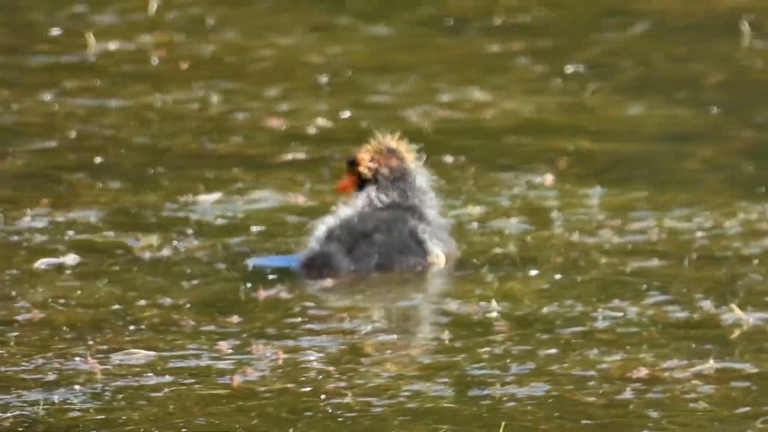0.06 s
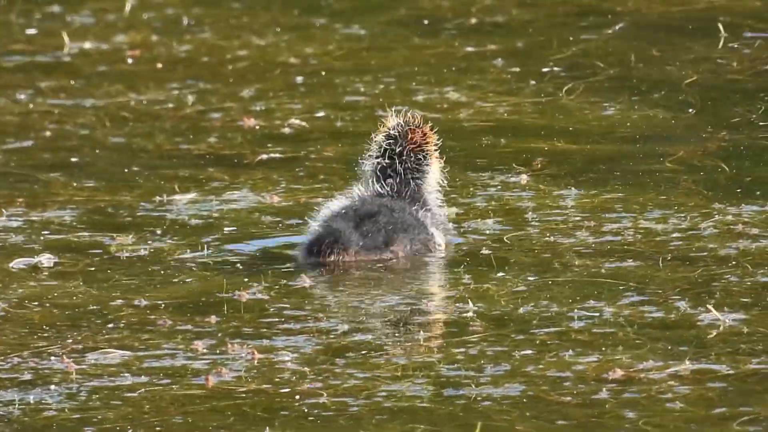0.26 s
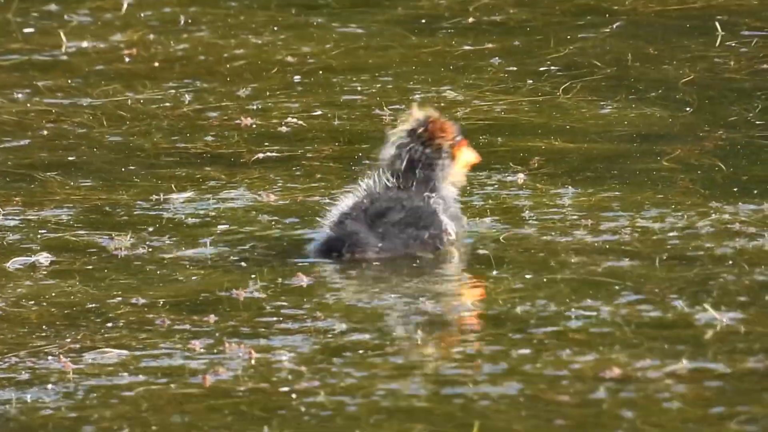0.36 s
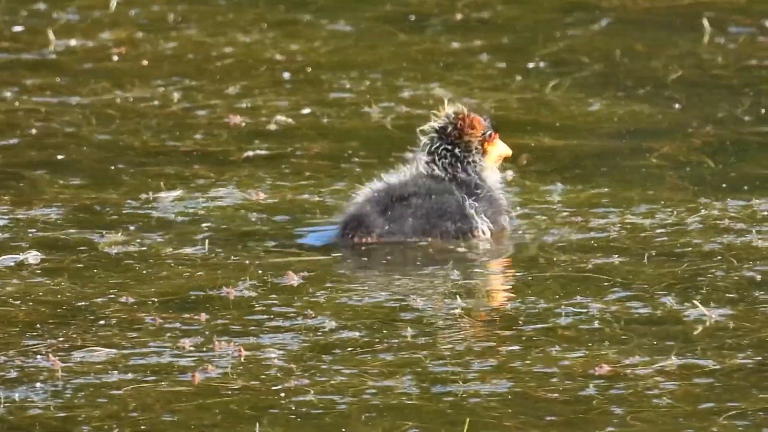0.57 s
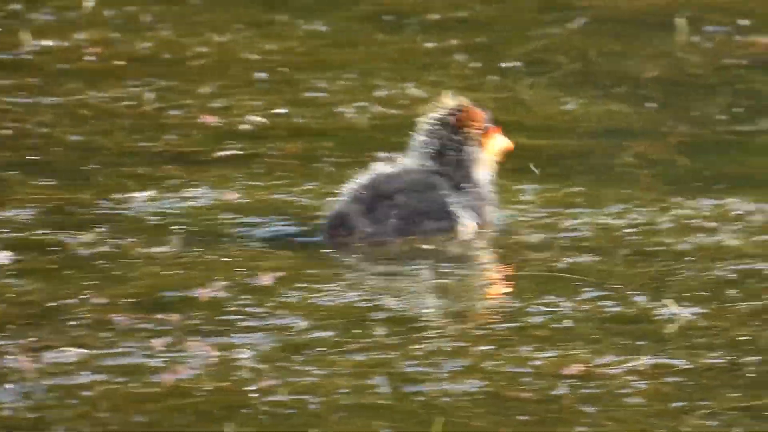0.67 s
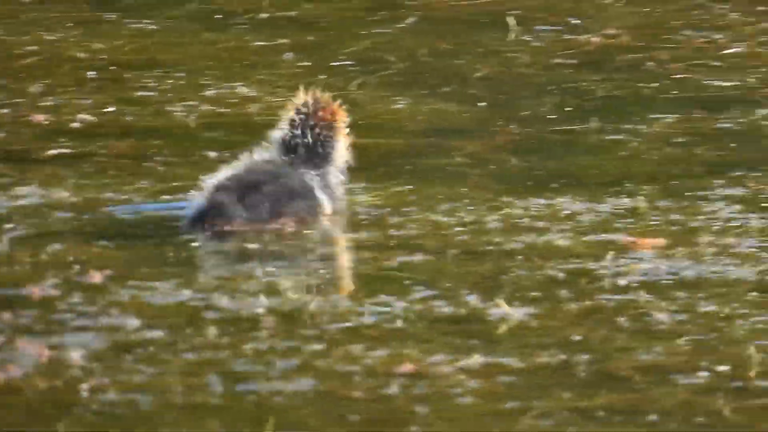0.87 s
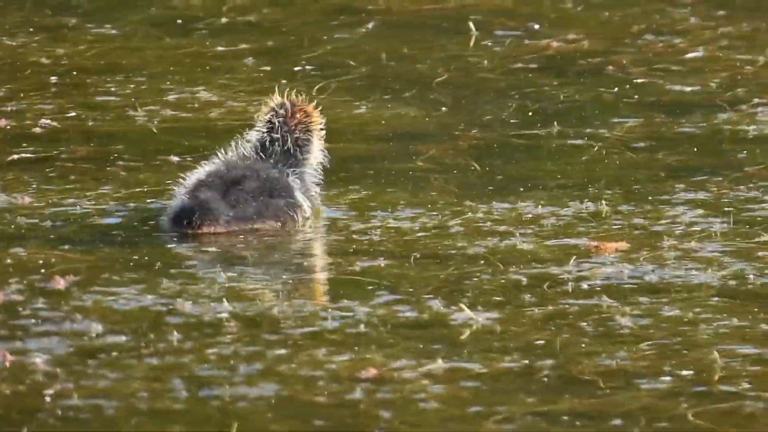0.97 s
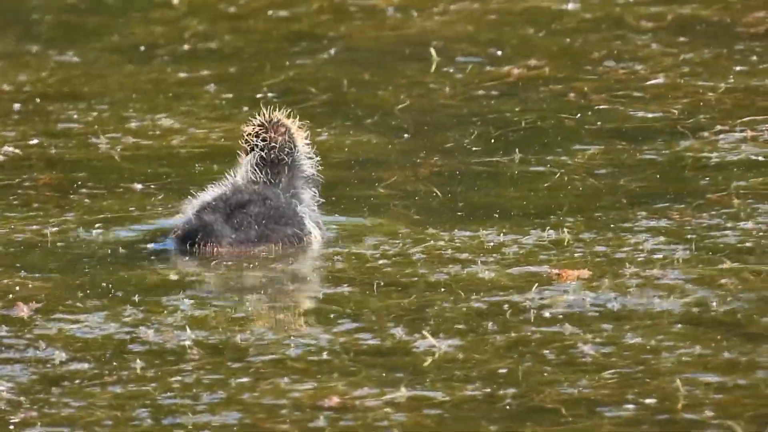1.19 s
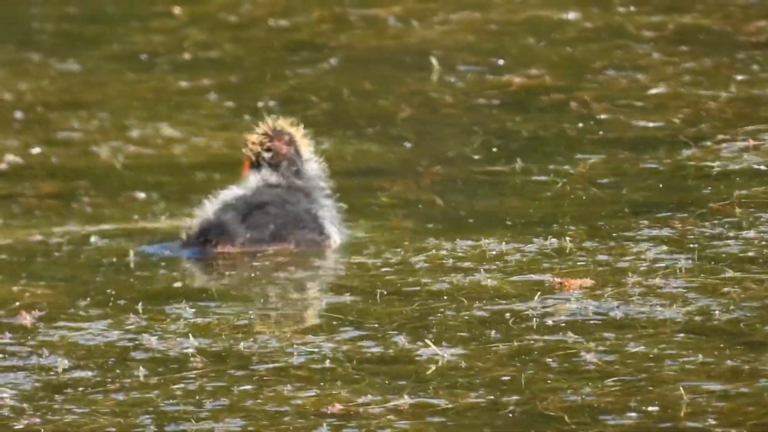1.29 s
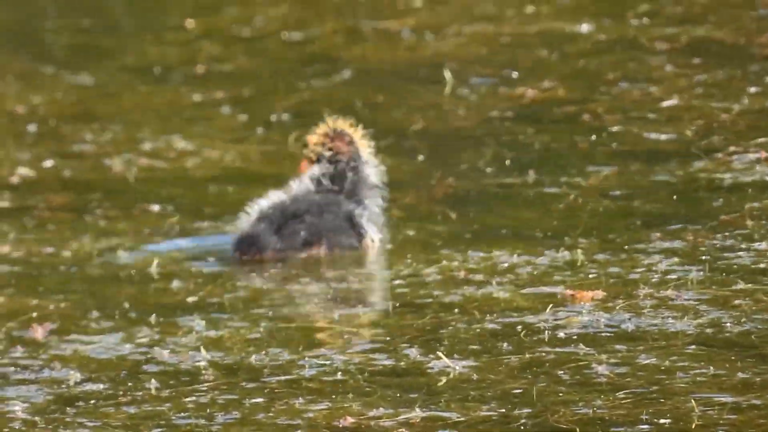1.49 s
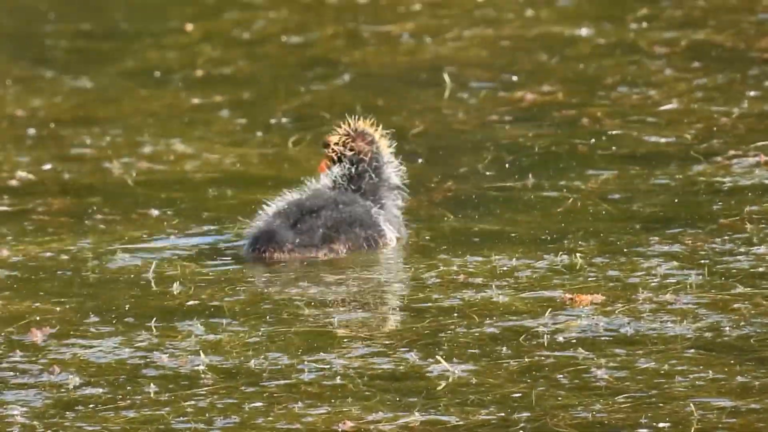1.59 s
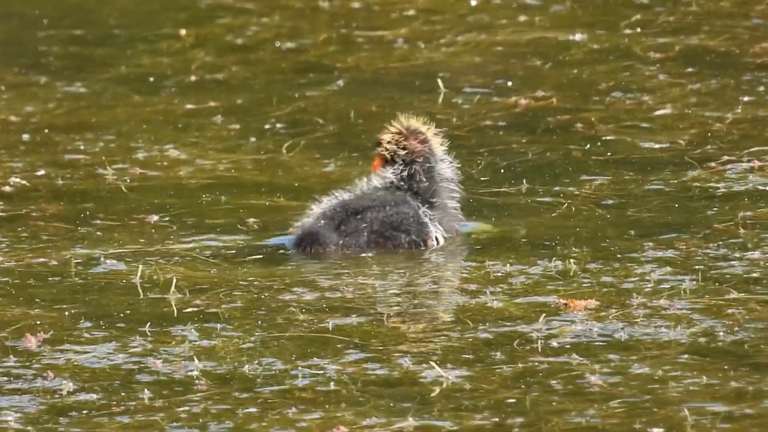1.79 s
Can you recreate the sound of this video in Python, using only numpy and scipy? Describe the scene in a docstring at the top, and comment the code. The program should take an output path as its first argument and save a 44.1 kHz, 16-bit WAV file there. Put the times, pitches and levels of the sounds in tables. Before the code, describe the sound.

A small songbird chirps, buzzes and trills by a pond over insect hiss and camera clicks

```python
"""Pond air and a narrow insect hiss are there at once, then a camera's lens motor knocks in pairs of steps.
A small songbird in the reeds to the left sings arched chirps, a held note, a buzz and a trill; far birds whistle.
Drops tick, reeds rustle, and short noise bursts add brief rustles, a low plop and a breathy blur. The birds are
gliding near-sine tones, the buzz, drops and knocks are short pushes that ring, and the rest is shaped noise."""
import sys
import numpy as np
from scipy import signal
from scipy.fft import rfft, irfft
from scipy.io import wavfile
from scipy.ndimage import uniform_filter1d, map_coordinates

SR = 44100
rng = np.random.default_rng(int(sys.argv[2]) if len(sys.argv) > 2 else 0)


def int16_out(signal):
    """Quantize to a 16-bit WAV file."""
    q = np.round(np.clip(np.atleast_2d(signal).T, -1, 1) * 32767)
    wavfile.write(sys.argv[1], SR, q.astype(np.int16))


def decibels_to_gain(level_db):
    """Convert a level in decibels to a linear amplitude gain (20 dB per decade)."""
    exponent = np.asarray(level_db, float) / 20
    return 10 ** exponent


N = 81585

# colour of the pond air: f/Hz, level per Hz/dB
AIR_COLOUR = [(100, -55), (200, -6), (350, -5.5), (817, -3.5), (1280, -10), (2110, -10), (2570, -16),
              (3220, -11.5), (3930, -18.5), (4680, -7.5), (5440, -16.5), (9180, -25), (11000, -33.5),
              (12500, -43), (15500, -88)]
# likeness of left and right in wide noise: f/Hz, likeness/0-1
LIKENESS = [(300, 0.57), (900, 0.56), (1600, 0.54), (3000, 0.25), (6000, 0), (9000, 0)]
# treble layer of the reeds' rustle over time: t/s, level/dB
RUSTLE_TREBLE_LEVEL = [(.88, -83), (.94, -62.5), (1.02, -87), (1.47, -72.5), (1.54, -61), (1.6, -57.5),
                       (1.63, -60), (1.68, -62), (1.72, -64), (1.8, -69.5)]
# colour of the treble layer: f/Hz, level per Hz/dB
RUSTLE_TREBLE_COLOUR = [(1000, -27), (2500, 5.5), (6000, -1.5), (10000, -4.5), (12000, -17), (15000, -29)]
# low layer of the rustle over time: t/s, level/dB
RUSTLE_LOW_LEVEL = [(1.45, -77), (1.55, -68.5), (1.62, -63.5), (1.65, -49), (1.68, -63), (1.72, -56.5),
                    (1.765, -53), (1.8, -56.5), (1.85, -47.5)]
# colour of the low layer: f/Hz, level per Hz/dB
RUSTLE_LOW_COLOUR = [(300, -15.5), (900, 5), (1600, 2), (2500, -6.5), (5000, -13), (12000, -56)]
# far whistles: top t/s, half length/s, top f/Hz, level/dB
WHISTLES = [(0.592, .042, 3600, -64), (.63, .056, 3676, -62)]
# water ticks: t/s, peak level/dB, f/Hz, width of first ring pass/Hz, left over right/dB
TICKS = [(0.2432, -60, 11700, 1510, 10), (0.9114, -32.5, 3300, 1090, 7), (0.939, -47.5, 8560, 4800, 19),
         (.9535, -56, 9000, 6000, 8), (0.9895, -37.5, 3130, 765, 6), (1.0007, -35.5, 3310, 890, 7),
         (1.0005, -62, 14300, 2500, 26), (1.0548, -49.5, 3290, 400, 8), (1.2882, -39.5, 1620, 2220, 7),
         (1.3065, -46.5, 2100, 1280, 15), (1.3496, -47, 1980, 1200, 0), (1.512, -44, 7300, 4500, 2),
         (1.679, -52.5, 11500, 4000, 18), (1.699, -46.5, 6900, 3000, 2)]
# short noise bursts: t/s, length/s, level/dB, centre f/Hz, width of first ring pass/Hz
NOISE_BURSTS = [(0.276, 0.031, -52.5, 2150, 370), (0.326, 0.0054, -51, 2140, 530),
                (0.425, 0.014, -56.5, 1800, 3400), (0.515, 0.036, -59, 2300, 1800),
                (0.571, 0.013, -46.5, 440, 210), (0.368, 0.015, -48.5, 2330, 440),
                (0.944, 0.035, -52, 1430, 750), (0.979, 0.038, -56, 1600, 1760),
                (1.66, 0.05, -73.5, 12500, 4000), (0.81, 0.0081, -56, 1700, 830)]
# lens steps: t/s, peak level/dB, extra upper ring/dB, extra lower ring/dB
STEPS = [(0.043, -42, -17, -4.5), (0.059, -41, 2.5, 6), (0.11, -46.5, 2, -5), (0.126, -41, 0.5, -12),
         (0.164, -50.5, -2, -7), (0.212, -42.5, -0.5, -3), (0.227, -40, -2, 0), (0.276, -40, -5, -2.5),
         (0.294, -47, 1, 2), (0.343, -42, -4, -5), (0.356, -45, -1.5, 5.5), (0.411, -45.5, 14, -3),
         (0.421, -34, -13, -5), (0.437, -45.5, 3, -10.5), (0.478, -45, -6, 0), (0.493, -40.5, -2, 5),
         (0.511, -41, 2, -16), (0.524, -39.5, -6, -16), (0.57, -46, -1, -14), (0.583, -41, -1, -2),
         (0.595, -43, 0, -13), (0.643, -49.5, -2, 3), (0.66, -48.5, 8, 5), (0.744, -52.5, 20, 3),
         (0.759, -49, 12, 7), (0.812, -43.5, -2.5, -6), (0.82, -37.5, -12, -4), (0.835, -47.5, 3, 5),
         (0.8785, -47.5, 4.5, -11), (0.894, -42, -0.5, 5.5), (0.948, -47.5, 3, 1),
         (0.9595, -35.5, -13.5, -6.5), (0.97, -45, -10, 0), (0.992, -41.5, 1, 4), (1.007, -48.5, 4, 7),
         (1.043, -49, -3, 0), (1.062, -45.5, -13, -10), (1.112, -45, -3, -12), (1.125, -49, 12, -4),
         (1.2135, -45.5, -1, -2.5), (1.227, -48.5, 6, -2), (1.3125, -45.5, -10, -25), (1.327, -45, 6, -17),
         (1.352, -51, -3, 7), (1.379, -46.5, -3, 5), (1.3955, -44, 10.5, 3), (1.45, -43.5, -9, 2.5),
         (1.633, -42.5, -10.5, -12), (1.645, -45.5, 1.5, 4.5), (1.695, -44.5, -3.5, -11),
         (1.705, -46, -6, 3), (1.762, -47.5, -1, -10), (1.779, -51.5, -5, 6), (1.829, -49.5, 3, 3.5),
         (1.845, -55, -1, 1)]
# ringing modes of the camera body, upper and lower ring first: f/Hz, level/dB, time to fall 60 dB/s
BODY = [(807.7, 3, 0.11), (350.3, -4.5, 0.16), (304.4, -13.5, 0.12), (526.5, -11.5, 0.041),
        (701.7, -8.5, 0.1), (897, -8.5, 0.07), (1002, -6, 0.058), (1358, -16, 0.1), (2100, -14, 0.056)]
# arched chirps: top t/s, rise/s, fall/s, top f/Hz, foot f/Hz, level before the throat/dB
CHIRPS = [(0.2549, 0.018, 0.018, 3520, 2292, -31.5), (0.391, 0.012, 0.00791, 2914, 2256, -30.5),
          (0.4232, 0.009, 0.0053, 2530, 2068, -35), (0.489, 0.013, 0.0037, 2626, 1954, -37),
          (0.631, 0.01, 0.00727, 2496, 1890, -36.5), (0.6912, 0.0105, 0.0102, 2587, 1883, -32)]
# trill notes: start t/s, low f/Hz, level before the throat/dB
TRILL = [(0.7115, 2020, -41.5), (0.7299, 2194, -36.5), (0.746, 2187, -36.5), (0.7641, 2229, -37),
         (.782, 2152, -41.5), (0.8003, 2143, -43), (0.82, 2166, -51)]
# held note: t/s, f/Hz, level before the throat/dB
HELD = [(.334, 2300, -65), (.341, 2417, -39.5), (.347, 2496, -36), (.361, 2535, -34.5), (.366, 2400, -40),
        (.371, 2400, -55)]
# strength of the base tone and its overtones in chirps and trill: level before the throat/dB
OVERTONES_DB = [0.5, -20, -18.5, -40]
# the same for the held note: level before the throat/dB
HELD_OVERTONES_DB = [0.5, -41, -19, -20.5]
# how throat and beak favour each pitch: f/Hz, level/dB
THROAT = [(1800, 3.5), (2500, 1.5), (3000, 5.5), (3550, -1), (5000, -13), (7500, -7.5), (8600, -3),
          (10500, -4.5), (12500, -21)]
# buzz over time: t/s, level before the two rings are averaged/dB, upper ring over lower/dB
BUZZ = [(.493, -54, -7), (.505, -46, 1), (.545, -43, 0.5), (.585, -46, 9), (.598, -54.5, 12),
        (.604, -98, -11)]
# lower and upper ring of the buzz: f/Hz, width of first pass/Hz
BUZZ_RINGS = [(1940, 107), (2640, 230)]
# how much louder the bird is on the left: f/Hz, level/dB
BIRD_PAN = [(2500, 8), (3500, 7), (8000, 0.5), (10500, 14)]


def curve(rows, t, index):
    """Column of a table joined by straight lines."""
    rows = np.array(rows, float)
    return np.interp(t, rows[:, 0], rows[:, index])


def level(x, db):
    """Scale to an rms level."""
    return x * decibels_to_gain(db) / np.sqrt(np.mean(x ** 2))


def colour(x, points):
    """Shape a signal by f/Hz, level/dB points on a log pitch axis."""
    hz = np.arange(N // 2 + 1) * SR / N + 1
    p = np.array(points, float)
    gain = decibels_to_gain(np.interp(np.log(hz), np.log(p[:, 0]), p[:, 1]))
    return irfft(rfft(x) * gain, N)


def ring(x, hz, width_hz):
    """Two-pole resonance, gain 1 at the centre."""
    b, a = signal.iirpeak(min(hz, 0.45 * SR), max(hz / width_hz, 0.3), SR)
    return signal.lfilter(b, a, x)


def walk(rate):
    """Smooth random drift with spread 1; a higher rate drifts faster."""
    k = int(SR / rate)
    w = uniform_filter1d(uniform_filter1d(rng.standard_normal(N), k), k)
    return w / w.std()


def place(x, pan_db, lead_s):
    """Left channel at full level; the right is pan_db quieter and lead_s later."""
    late = map_coordinates(x, [np.arange(N) - lead_s * SR], order=3)
    return np.array([x, decibels_to_gain(-pan_db) * late])


def spread(points):
    """Stereo noise of a given colour; left and right are mixed from a shared and an opposed part."""
    hz, like = np.array(LIKENESS).T
    like = np.clip(like, 0, 0.99)
    noise = colour(rng.standard_normal((2, N)), points)
    mid = colour(noise[0], list(zip(hz, 10 * np.log10(1 + like))))
    side = colour(noise[1], list(zip(hz, 10 * np.log10(1 - like))))
    return level(np.array([mid + side, decibels_to_gain(-2.0) * (mid - side)]), 0)


def pond_air():
    """Wide noise, strongest in the low and middle pitches, whose level drifts slightly."""
    return spread(AIR_COLOUR) * decibels_to_gain(-59.5 + 0.62 * walk(18))


def insects():
    """A chorus rasping in one narrow band, throbbing, mostly from the left."""
    centre_hz, width_hz, level_db = 4666, 605, -61  # width of each of two ring passes
    throb_hz, throb_depth, flicker_db = 72.9, 0.48, 1.8
    throb_phase = 2 * np.pi * np.cumsum(throb_hz * (1 + 0.17 * walk(3.96))) / SR
    throb = 1 + throb_depth * np.sin(throb_phase)
    hisses = []
    for _ in range(3):
        band = ring(ring(rng.standard_normal(N), centre_hz, width_hz), centre_hz, width_hz)
        hisses.append(level(band, 0) * decibels_to_gain(flicker_db * walk(25)))
    chorus = place(hisses[0] * throb, 3.2, 0.00006)
    wide = np.array(hisses[1:])  # part without throb, different in each ear
    return decibels_to_gain(level_db) * (chorus + 0.15 * wide)


def rustle_treble(t):
    """Treble layer of the reeds' rustle: bright wide noise that swells and flutters."""
    noise = spread(RUSTLE_TREBLE_COLOUR)
    gain = decibels_to_gain(curve(RUSTLE_TREBLE_LEVEL, t, index=1) + 2.0 * walk(50))
    return noise * gain * (t > RUSTLE_TREBLE_LEVEL[0][0])


def rustle_low(t):
    """Low layer of the rustle: wide mid and low noise, coming slightly later, with an uneven level."""
    noise = spread(RUSTLE_LOW_COLOUR)
    gain = decibels_to_gain(curve(RUSTLE_LOW_LEVEL, t, index=1) + 5.2 * walk(29))
    return noise * gain * (t > RUSTLE_LOW_LEVEL[0][0])


def whistle(t):
    """Two faint far whistles overlap; each glides up to its top pitch and down again."""
    sag_hz = 678
    tone = 0
    for top, half, top_hz, db in WHISTLES:
        u = np.clip((t - top) / half, -1, 1)
        hz = top_hz - sag_hz * np.abs(u) ** 2.2 + 25 * walk(150)
        gain = decibels_to_gain(db + 1.6 * walk(120)) * np.sqrt(1 - u ** 2)
        tone = tone + np.sin(2 * np.pi * np.cumsum(hz) / SR) * gain
    return place(np.sqrt(2) * tone, -1.8, 0.00002)


def ticks(t):
    """Drops and snaps: a tiny burst rung three times at one pitch."""
    out, age = np.zeros((2, N)), t[:SR // 40]
    for start, db, f, width_hz, pan_db in TICKS:
        burst = (age == 0) + 0.061 * rng.standard_normal(len(age)) * np.exp(-age / 0.0034)
        tick = ring(ring(ring(burst, f, width_hz), f, 2 * width_hz), f, 2 * width_hz)
        gain = decibels_to_gain(db + np.array([[pan_db], [-pan_db]]) / 2)
        i = int(start * SR)
        out[:, i:i + len(age)] += gain * tick / np.abs(tick).max()
    return out


def noise_bursts(t):
    """Brief rustles, a low plop, a breathy blur after the held note: each a swell of noise in one band."""
    out = 0
    for start, length, db, f, width_hz in NOISE_BURSTS:
        swell = np.sin(np.pi * np.clip((t - start) / length, 0, 1) ** 0.91) ** 2
        mid, side = rng.standard_normal((2, N)) * swell * decibels_to_gain(1.0 * walk(550))
        pair = np.array([mid + 0.18 * side, 0.78 * (mid - 0.39 * side)])
        burst = ring(ring(pair, f, width_hz), f, 2 * width_hz)
        out = out + decibels_to_gain(db) * burst / np.sqrt(np.sum(burst ** 2) / (length * SR))
    return out


def lens(t):
    """Each motor step pushes the body, which rings in its modes and rattles briefly."""
    push_s, rattle_s = 0.00059, 0.004
    hold_s, stop_t60_s = 0.017, 0.04  # the drive holds the upper ring up, then lets go
    out, age = np.zeros((2, N)), t[:SR // 6]
    stop = decibels_to_gain(-60 * np.clip(age - hold_s, 0, 1) / stop_t60_s)
    chances = rng.standard_normal((len(STEPS), len(BODY), 2))
    noises = rng.standard_normal((len(STEPS), 2, len(age))) * np.exp(-age / rattle_s)
    for (start, db, upper_db, lower_db), chance, noise in zip(STEPS, chances, noises):
        body = 0
        for k, (f, mode_db, t60) in enumerate(BODY):
            detune, vary = chance[k]
            mode = np.sin(2 * np.pi * f * (1 + 0.025 * detune) * age) * decibels_to_gain(-60 * age / t60)
            extra_db = (k == 0) * upper_db + (k == 1) * lower_db
            body = body + decibels_to_gain(mode_db + 2 * vary + extra_db) * mode * (1 if k else stop)
        rattle = ring(ring(noise[0] + 2.8 * noise, 710, 1010), 890, 2350)
        hit = body * (1 - np.exp(-age / push_s)) + rattle
        i = int(start * SR)
        out[:, i:i + len(age)] += (decibels_to_gain(db) * hit / np.abs(hit).max())[:, :N - i]
    return out


def bank_echo(dry, t):
    """Echoes off the bank: the song is smeared by a fading noise tail, different in each ear."""
    rise_s, t60_s, level_db = 0.0056, 0.16, -18.5
    age = t[:SR // 2]
    tails = rng.standard_normal((2, len(age))) * decibels_to_gain(-60 * age / t60_s) * (1 - np.exp(-age / rise_s))
    wet = [signal.fftconvolve(dry, h / np.sqrt(np.sum(h ** 2)))[:N] for h in tails]
    return decibels_to_gain(level_db) * np.array(wet)


def buzz(t):
    """Fast, slightly uneven pulses set off two rings whose balance shifts."""
    pulse_hz = 137.1
    count = np.floor((t - BUZZ[0][0]) * pulse_hz + 0.66 + 0.02 * walk(140))
    pulses = np.diff(count, prepend=0) * (t > 0) * decibels_to_gain(1 * walk(140))
    pulses = np.convolve(pulses, np.exp(-t[:60] / 0.00044))[:N]
    pulses = pulses * (1 + 0.25 * rng.standard_normal(N))
    low, high = (level(ring(ring(pulses, f, w), f, 3 * w), 0) for f, w in BUZZ_RINGS)
    on = (t > BUZZ[0][0]) & (t < BUZZ[-1][0])
    mix = (low + decibels_to_gain(curve(BUZZ, t, index=2)) * high) / 2
    return on * decibels_to_gain(curve(BUZZ, t, index=1)) * mix


def syrinx(hz, gain, overtones_db):
    """Near-sine voice; the throat weighs each overtone at its pitch of the moment, and effort adds overtones."""
    effort_db, fall_dull_db = -32.5, -5.5  # overtones fade below this effort and while the pitch falls
    hz, gain = uniform_filter1d(hz, size=50), uniform_filter1d(gain, size=30)
    phase = 2 * np.pi * np.cumsum(hz * (1 + 0.004 * walk(370))) / SR
    falling = np.clip(-np.gradient(hz), 0, 1)
    bright = np.sqrt(np.abs(gain) / decibels_to_gain(effort_db)) * decibels_to_gain(fall_dull_db * falling + 2.7 * walk(330))
    tone = 0
    for k, db in enumerate(overtones_db, start=1):
        part = decibels_to_gain(db + curve(THROAT, k * hz, index=1)) * np.sin(k * phase)
        tone = tone + part * (bright if k > 1 else 1)
    return np.sqrt(2) * gain * decibels_to_gain(0.8 * walk(200)) * tone


def chirps_and_trill(t):
    """Pitch and gain: chirps arch up and down; trill notes drop in from above and curl up again."""
    arch_per_s, swell_power = 28, 0.88  # longer chirps have rounder tops
    ragged_db = 2.5  # flutter on the legs of the arch
    note_s, rise_s, fall_s, sag_db = 0.019, 0.0013, 0.0016, -6.5
    catch_s, catch_width_s = 0.0144, 0.00098  # the voice catches near the end of each note, then blips
    onset_hz, onset_s, end_hz = 327, 0.0027, 490
    hz, gain = np.full(N, float(CHIRPS[0][4])), np.zeros(N)
    flutter = walk(630)
    for top, rise, fall, top_hz, foot_hz, db in CHIRPS:
        u = np.interp(t, [top - rise, top, top + fall], [1, 0, 1])  # 0 at the top, 1 at the feet
        arch = top_hz - (top_hz - foot_hz) * u ** (1 + arch_per_s * (rise + fall))
        hz = np.where(u < 1, arch, hz)
        gain = gain + decibels_to_gain(db + ragged_db * u ** 2 * flutter) * (1 - u ** 2) ** swell_power
    for start, low_hz, db in TRILL:
        age = np.clip(t - start, 0, note_s)
        hook = low_hz + onset_hz * np.exp(-age / onset_s) + end_hz * (age / note_s) ** 3
        hz = np.where(t >= start, hook, hz)
        edge = np.clip(age / rise_s, 0, 1) * np.clip((note_s - age) / fall_s, 0, 1)
        catch = 1 - np.exp(-((age - catch_s) / catch_width_s) ** 2)
        gain = gain + decibels_to_gain(db + sag_db * age / note_s) * edge * catch
    return hz, gain


def held_note(t):
    """One voiced note follows its own pitch and level curves."""
    on = (t > HELD[0][0]) * (t < HELD[-1][0])
    return syrinx(curve(HELD, t, index=1), decibels_to_gain(curve(HELD, t, index=2)) * on, HELD_OVERTONES_DB)


def songbird(t):
    """Voice and buzz reach the left ear first and louder, with echoes around them."""
    hz, gain = chirps_and_trill(t)
    rasp = buzz(t)
    dry = syrinx(hz, gain, OVERTONES_DB) + held_note(t) + rasp
    left, right = place(dry, 0, 0.0001)
    right = colour(right, np.array(BIRD_PAN) * [1, -1])
    return np.array([left, right]) + bank_echo(dry, t)


def scene():
    """All sources at the microphone pair."""
    t = np.arange(N) / SR
    birds = songbird(t) + whistle(t)
    near = lens(t) + noise_bursts(t) + ticks(t)
    return birds + near + insects() + pond_air() + rustle_treble(t) + rustle_low(t)


def low_pass(x):
    """Removes everything above the highest recorded frequency."""
    return signal.sosfilt(signal.butter(12, 15710, fs=SR, output="sos"), x)


def record(dry):
    """The camera cuts the deep bass and the top treble."""
    no_bass = signal.sosfilt(signal.butter(3, 190, "high", fs=SR, output="sos"), dry)
    mix = signal.sosfilt(signal.butter(8, 15000, fs=SR, output="sos"), no_bass)
    return low_pass(mix)


dry = scene()
out = record(dry)
int16_out(out)
```